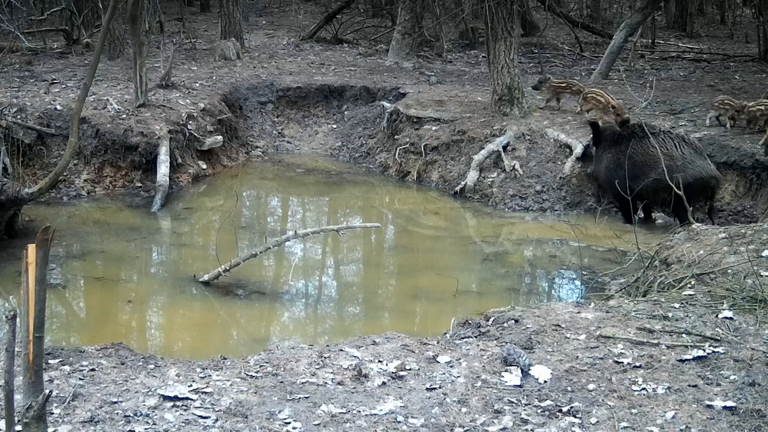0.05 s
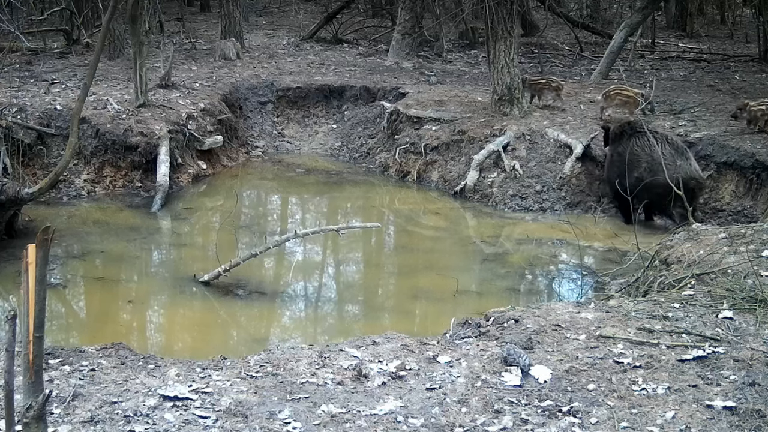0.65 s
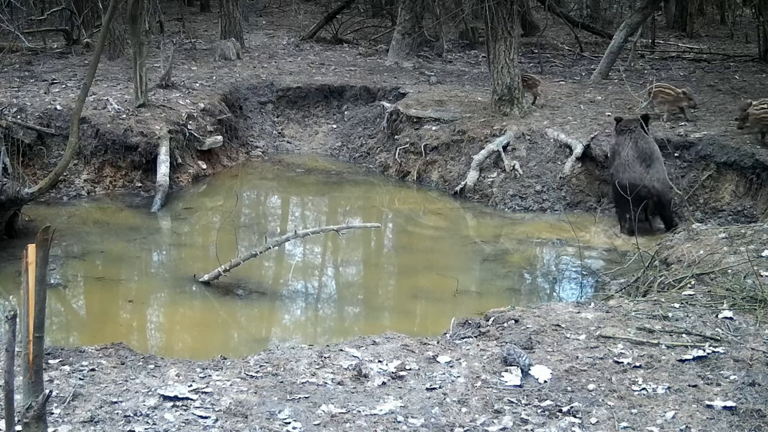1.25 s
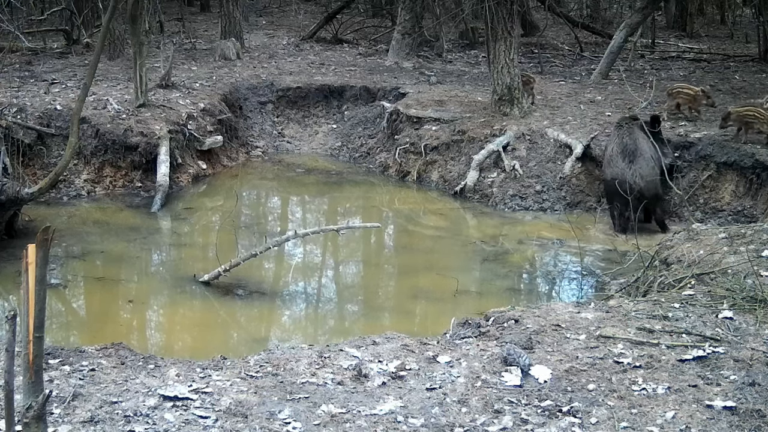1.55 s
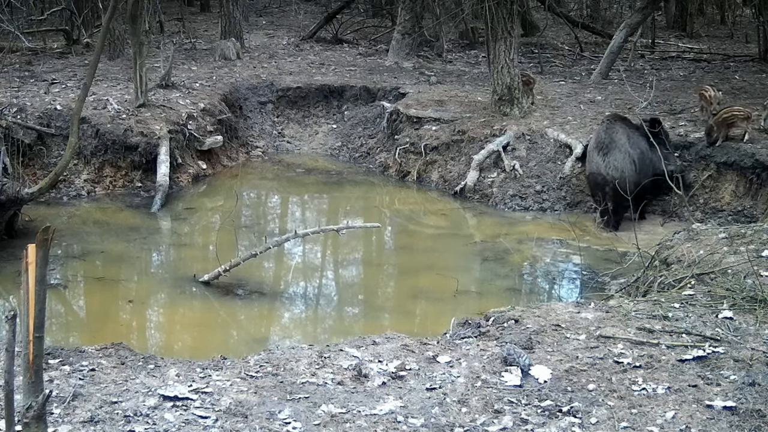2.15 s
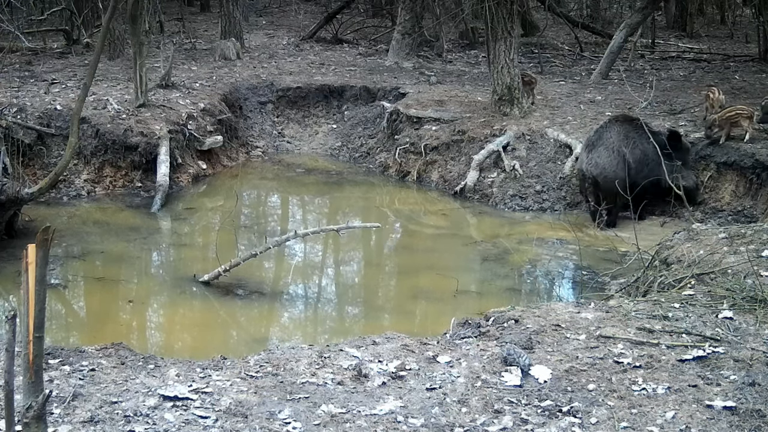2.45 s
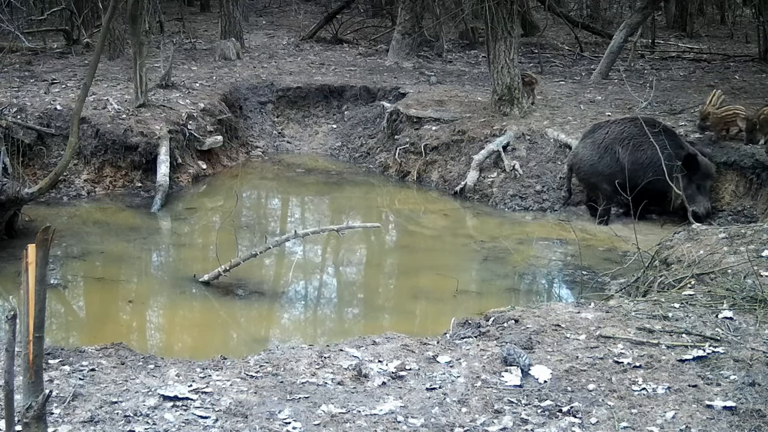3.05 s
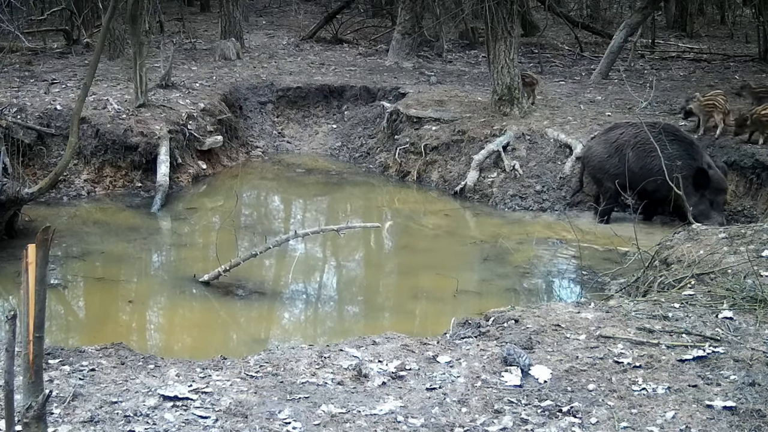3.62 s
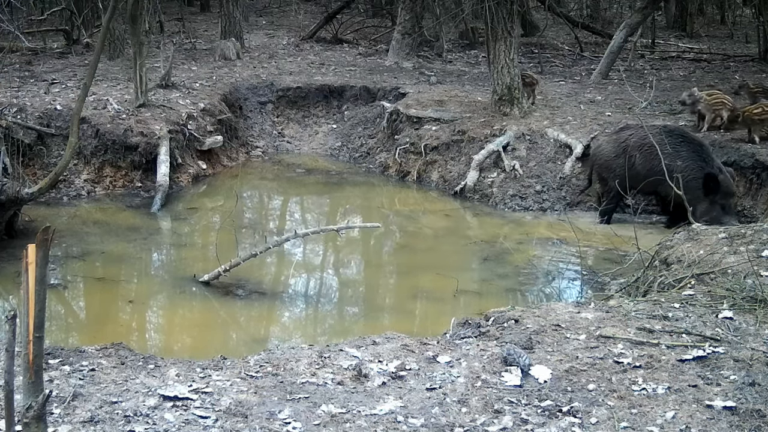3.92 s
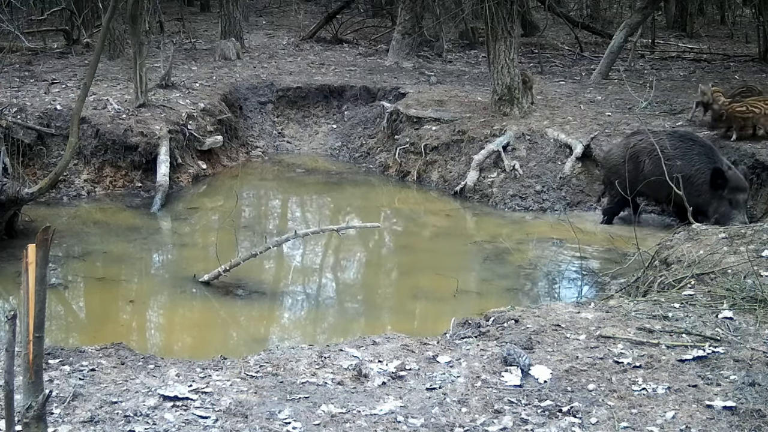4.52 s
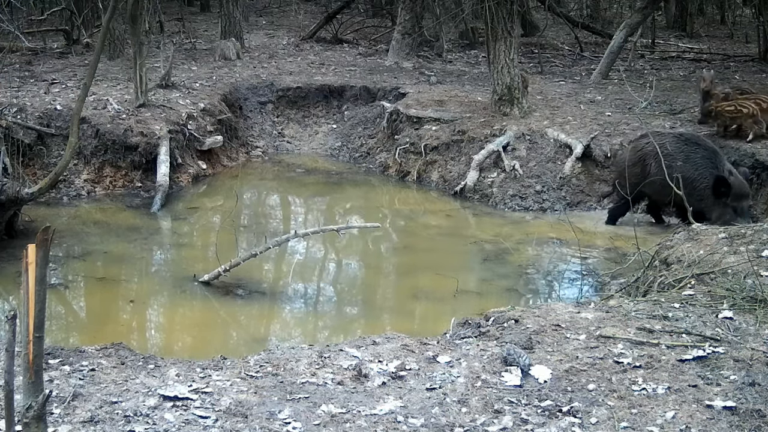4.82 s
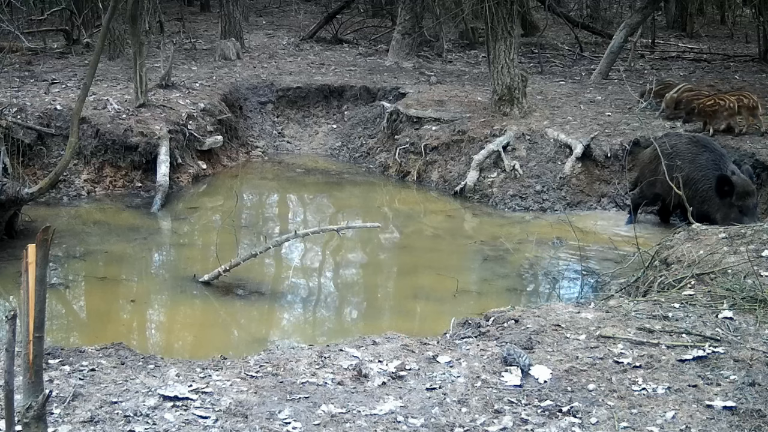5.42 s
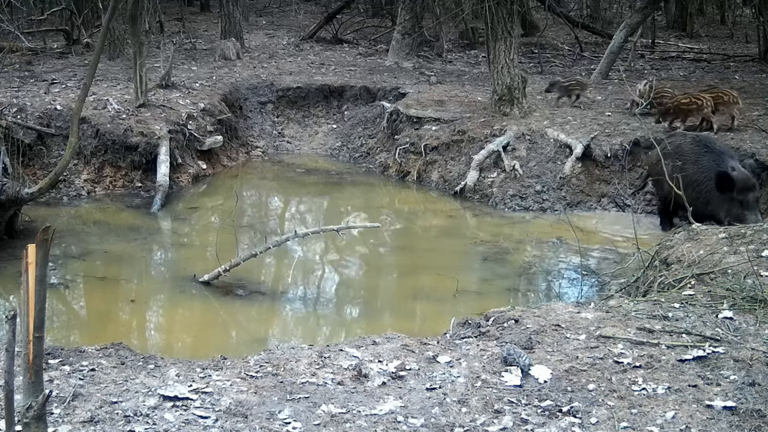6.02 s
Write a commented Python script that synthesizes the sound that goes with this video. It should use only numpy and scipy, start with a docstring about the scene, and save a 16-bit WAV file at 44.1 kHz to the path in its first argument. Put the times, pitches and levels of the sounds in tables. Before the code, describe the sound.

A songbird whistles one quick, high phrase while a second bird calls faintly far off. Some way from the microphone, a wild sow and her piglets shuffle along the bank of a forest pool. Dry leaves crackle, twigs snap and wet mud squelches and plops. The rustling grows louder past the middle, then eases. A soft hush and low rumble lie underneath, and the trees return a short echo.

```python
"""A songbird whistles one phrase over rustling leaves and a low rumble; a second bird calls far off.
The rustle is a wild sow and her piglets on the bank of a forest pool, some way from the listener.
Dry leaves crackle, twigs snap, and wet mud churns and plops under her hooves and snout.
The tree trunks scatter these sounds back as a short, soft echo."""
import sys
import numpy as np
from scipy import signal
from scipy.fft import rfft, irfft
from scipy.io import wavfile
from scipy.ndimage import uniform_filter1d

SR = 44100
rng = np.random.default_rng(int(sys.argv[2]) if len(sys.argv) > 2 else 0)


def put_to_file(sound):
    """Save the sound as 16-bit audio at rate SR, in the file named by the first command-line argument."""
    columns = np.atleast_2d(sound).T  # one column per channel
    safe = np.clip(columns, -1, 1)
    whole_steps = np.round(safe * 32767)
    wavfile.write(sys.argv[1], SR, whole_steps.astype(np.int16))


N = 276507
TIME = np.arange(N) / SR

# The songbird's syllables. Each row: seconds into the syllable, pitch in Hz, relative level in dB.
PIP = [(0, 4470, -4), (0.022, 4740, -4), (.045, 5020, -15)]
FALL = [(0, 4170, -11), (.02, 4165, 2), (.055, 4020, -9.5), (.08, 3975, 5), (.127, 2900, -13)]
ARCH = [(0, 3170, -16), (.029, 3260, 1), (.052, 3850, -0.5), (.07, 4070, -4.5), (.091, 3500, -3),
        (.116, 2750, -4.5)]
RISE = [(0, 3120, -12), (.023, 3310, 0), (.043, 3460, 2), (.067, 3500, -17), (.1, 3640, -14)]
SWEEP = [(0, 2594, -13), (.018, 2994, -5), (.032, 3244, -2), (.045, 4005, 1), (.056, 4800, -0.5),
         (.07, 4920, -11)]
SCOOP = [(0, 3080, 1), (.035, 2854, -6), (.064, 2930, -1), (.092, 3640, -4), (.122, 3850, 1.5),
         (.147, 4100, -19)]
DIP = [(0, 3430, 3), (.031, 3047, -3), (.058, 2900, -1), (.098, 3660, -6), (.128, 3930, 0)]
# Its song. Each row: start in seconds, relative level in dB, syllable.
PHRASE = [(.005, -38.5, PIP), (0.134, -41.5, FALL), (0.332, -40.5, ARCH), (0.528, -39.5, ARCH),
          (.718, -43, ARCH), (.945, -40.5, RISE), (1.084, -42.5, SWEEP), (1.198, -41.5, SWEEP),
          (1.319, -41.5, SWEEP), (1.453, -45.5, SCOOP), (1.657, -44.5, DIP)]
# The far bird's notes. Each row: start and length in seconds, pitch in Hz, relative level in dB.
FAR_NOTES = [(0, .12, 2325, -47), (0.337, .23, 2315, -51), (5.418, .22, 2286, -61)]
# The forest's echo. Each row: frequency in Hz, seconds it takes to fade by 60 dB.
ECHO_FADE = [(200, 0.27), (1500, 0.27), (4000, 0.47), (12000, 0.39)]
# Tone colours: how deep or bright each noise is. Each row: frequency in Hz, relative level in dB.
HUSH_COLOUR = [(20, -16.5), (100, -8.5), (200, -12), (330, -20), (600, -25), (1200, -32), (2500, -42),
               (4500, -34.5), (8000, -36.5), (12500, -36.5)]
RUMBLE_COLOUR = [(12, -21), (22, -4), (34, -2), (45, 0), (56, 3), (68, -5.5), (90, -10.5), (150, -23.5),
                 (400, -52)]
DRY_LEAF_COLOUR = [(800, -32), (2000, -7.5), (3200, -4), (5000, -1), (7500, -2), (10000, -4), (12500, -3)]
DAMP_LEAF_COLOUR = [(150, -37), (400, -7), (900, -3.5), (1600, 1), (2700, 1), (4200, 0), (7000, -8.5),
                    (12500, -68)]
CRUNCH_COLOUR = [(200, 8), (900, -8), (2500, 2), (5000, 4), (8000, 1), (12500, -3.5)]
# The whole group's restless shuffling. Each row: time in seconds, relative level in dB.
SHUFFLE = [(0, -59.5), (.85, -60), (1.2, -58.5), (1.42, -61), (1.68, -57), (2.1, -60), (2.4, -69.5),
           (2.62, -66), (2.85, -58.5), (4.1, -54.5), (4.31, -65.5), (4.6, -55), (5.0, -70), (5.25, -69),
           (5.5, -60.5), (5.8, -64), (6.0, -60.5), (6.27, -62.5)]
# Steps and shoves. Each row: moment of full weight, rise time and fall time, all in seconds,
# then the levels of dry leaves and of damp leaves in dB.
STEPS = [(.005, 0.012, 0.037, -54, -42.5), (.175, 0.024, 0.096, -52, -53), (.35, 0.023, 0.063, -51, -64),
         (.49, 0.034, 0.068, -56, -58), (.56, 0.051, 0.065, -51.5, -65), (.64, .04, 0.031, -47, -57),
         (.76, 0.026, 0.016, -53, -68), (.94, 0.024, 0.06, -69, -48), (1.046, 0.035, .012, -67, -50.5),
         (1.083, .006, 0.028, -54, -48), (1.14, 0.015, 0.018, -45, -67), (1.58, .015, 0.033, -51.5, -59),
         (1.776, 0.079, 0.03, -58.5, -42.5), (1.89, 0.022, 0.074, -53.5, -49), (2.06, .02, 0.056, -55, -62),
         (2.45, 0.012, .012, -56, -66), (2.725, 0.053, 0.14, -63, -48.5), (2.795, 0.034, 0.065, -48, -49.5),
         (2.95, 0.037, 0.092, -41.5, -51.5), (3.14, .03, 0.036, -47.5, -61), (3.326, 0.059, 0.1, -38, -48),
         (3.4, 0.034, 0.02, -37.5, -48.5), (3.56, 0.069, 0.075, -38, -46), (3.74, 0.069, .04, -42, -46.5),
         (3.82, 0.035, .02, -34, -39.5), (3.895, .008, 0.011, -43, -43), (3.98, 0.053, 0.18, -40.5, -50),
         (4.09, 0.092, 0.019, -47, -46.5), (4.2, .025, 0.02, -51, -43), (4.38, 0.03, 0.09, -43, -46.5),
         (4.48, .05, 0.095, -37, -44), (4.61, 0.051, .04, -46, -62), (4.72, 0.068, 0.043, -50.5, -49.5),
         (4.799, 0.031, 0.0083, -52.5, -48.5), (5.08, 0.02, .03, -60, -65), (5.45, 0.096, .04, -53, -81),
         (5.55, 0.027, .04, -52.5, -63), (5.62, 0.011, 0.084, -53, -70), (5.735, 0.028, 0.011, -57, -52),
         (5.85, 0.012, 0.021, -80, -56), (6.07, 0.008, 0.013, -46, -46), (6.2, 0.017, 0.034, -52, -57),
         (6.265, 0.031, .05, -49.5, -50.5)]
# Hooves crushing leaves. Each row: middle in seconds, level in dB, half length in seconds.
CRUNCHES = [(0.17, -50, 0.013), (0.928, -45, 0.0066), (0.951, -44.5, .0061), (1.747, -50.5, .004),
            (1.889, -51, 0.0044), (2.899, -41, 0.0054), (2.947, -46, .0046), (2.984, -38.5, 0.0037),
            (3.261, -42, 0.0023), (3.401, -36, 0.012), (3.773, -34.5, .0058), (3.834, -32, 0.0039),
            (4.094, -38.5, 0.0036), (4.371, -39, .0018), (4.454, -38, .0045), (6.063, -45, .002),
            (6.068, -33.5, 0.0016), (6.201, -42.5, 0.0013)]
# Air pockets popping in mud and water.
# Each row: start in seconds, peak level in dB, starting pitch in Hz, fade time in seconds.
PLOPS = [(.859, -48, 1130, 0.005), (1.046, -39, 326, 0.011), (1.05, -31.5, 1160, 0.0024),
         (1.048, -33.5, 1830, .002), (1.0777, -35, 1460, 0.0031), (1.08, -39.5, 1060, 0.0086),
         (1.764, -35, 1820, .0023), (1.768, -38, 1050, .002), (1.786, -37, 806, .0012),
         (2.117, -49, 957, 0.01), (2.292, -53, 1450, 0.0059), (2.706, -42, 1120, 0.0056),
         (2.718, -33, 1780, 0.0041), (2.775, -39, 2330, 0.01), (2.791, -40, 359, 0.0061),
         (3.3174, -34.5, 1480, .002), (3.397, -36, 1060, 0.003), (3.819, -28, 1400, 0.00088),
         (4.178, -22, 850, 0.00069), (4.194, -33, 740, .0007), (4.2015, -34.5, 726, 0.002),
         (4.804, -38.5, 1630, 0.0024), (5.7224, -36, 1460, 0.0057), (5.846, -34.5, 1300, 0.00089)]
# Mud hollows opening or filling.
# Each row: start and end in seconds, level in dB, first and last pitch in Hz.
GURGLES = [(0.152, 0.26, -55.5, 300, 360), (1.043, 1.117, -59, 332, 332), (2.713, 2.767, -51, 700, 590),
           (2.756, 2.805, -50.5, 420, 350), (3.573, 3.671, -54, 380, 590), (3.757, 3.843, -58.5, 360, 410),
           (4.773, 4.82, -53, 445, 400)]
# Twigs and stalks breaking. Each row: start in seconds, peak level in dB, pitch in Hz.
SNAPS = [(0.2193, -26.5, 4000), (.3168, -31, 4300), (0.93, -26.5, 5900), (1.094, -33, 5000),
         (1.144, -28, 4570), (1.153, -27, 2900), (1.4985, -37, 6170), (1.7865, -26, 2860),
         (2.515, -37.5, 6060), (3.6684, -21.5, 9300), (3.7429, -16.5, 5850), (3.941, -21.5, 8400),
         (3.968, -14, 6470), (3.9894, -18.5, 8250), (3.996, -22, 7800), (4.101, -26, 7700),
         (4.177, -29, 4630), (4.2176, -28, 4850), (4.858, -38, 6960), (5.064, -34.5, 4750),
         (5.528, -34, 7000), (5.7355, -33.5, 9400), (6.0604, -28.5, 6400), (6.065, -31, 9400)]


def from_db(db):
    """Turns decibels into a gain, the number a sound is multiplied by."""
    return 10 ** (np.asarray(db) / 20)


def unit(x):
    """Scales x to an average strength (rms) of 1."""
    return x / np.sqrt(np.mean(x ** 2) + 1e-20)


def at_hz(points, hz):
    """Reads between a table's rows, with frequencies spaced by octaves."""
    f, value = np.transpose(points)
    return np.interp(np.log(hz + 1), np.log(f + 1), value)


def coloured(x, colour):
    """Filters x by a tone colour (rows of Hz, dB) and sets its strength to 1."""
    gains = from_db(at_hz(colour, np.fft.rfftfreq(len(x), 1 / SR)))
    return unit(irfft(rfft(x) * gains, len(x)))


def add(mix, start_s, sound):
    """Adds a sound to the mix at the given time."""
    part = mix[max(round(start_s * SR), 0):][:len(sound)]
    part += sound[:len(part)]


def ring(hz, fade_s, glide):
    """A dying tone of peak 1; every fade_s its pitch rises by glide times hz."""
    t = np.arange(int(7 * fade_s * SR) + 8) / SR
    tone = np.sin(2 * np.pi * hz * t * (1 + glide * t / fade_s / 2))
    wave = tone * np.exp(-t / fade_s) * (1 - np.exp(-2 * hz * t))
    return wave / abs(wave).max()


def grains(per_s, spread_db, low_hz, high_hz, fade_cycles, glide=0, pitches=32):
    """A steady rain of tiny ringing sounds, most of them weak and a few strong."""
    chance, size, kind = rng.random(N), rng.exponential(1, N), rng.integers(0, pitches, N)
    kicks = from_db(spread_db * np.minimum(size, 4.5)) * rng.choice([-1, 1], N)
    starts = np.flatnonzero(chance < per_s / SR)
    out = np.zeros(N)
    for k, hz in enumerate(np.geomspace(low_hz, high_hz, pitches)):
        grain = hz * ring(hz, fade_cycles / hz, glide)
        at = starts[kind[starts] == k, None]
        samples = at + np.arange(len(grain))
        out += np.bincount(samples.ravel(), (kicks[at] * grain).ravel(), N)[:N]  # sums the copies
    return unit(out)


def wobble(depth_db, smooth_s):
    """A gain that drifts up and down at random."""
    hop = 64
    samples = np.arange(2 * N // hop) * hop
    bell = np.exp(-(np.arange(-60, 61) * hop / SR / smooth_s) ** 2)
    drift = unit(np.convolve(rng.standard_normal(len(samples)), bell, "same"))
    return unit(from_db(depth_db * np.interp(np.arange(N), samples, drift)))


def whistle(hz, db, waver, flutter_db):
    """One pure gliding whistle, a little unsteady in pitch and strength."""
    drift, flutter = unit(uniform_filter1d(rng.standard_normal((2, SR // 2)), size=220))[:, :len(hz)]
    pitch = uniform_filter1d(hz, size=350) * (1 + waver * drift)
    loudness = np.sqrt(2) * from_db(db + flutter_db * flutter) * signal.windows.tukey(len(hz), .12)
    return loudness * np.sin(2 * np.pi * np.cumsum(pitch) / SR)


def songbird():
    """The near bird strings whistled syllables into one phrase."""
    out = np.zeros(N)
    for start, level_db, syllable in PHRASE:
        times, hz, db = np.transpose(syllable)
        t = np.arange(0, times[-1], 1 / SR)
        pitch, level = np.interp(t, times, hz), level_db + np.interp(t, times, db)
        add(out, start, whistle(pitch, level, waver=.006, flutter_db=3))
    return out


def branches(song, bounce_db=-18, count=6):
    """Quick echoes from branches and the ground overlap a gliding whistle and make it quiver."""
    out = song.copy()
    for delay_s, sign in zip(rng.uniform(.00189, .027, count), rng.choice([-1, 1], count)):
        add(out, delay_s, sign * from_db(bounce_db) * song)
    return out


def far_bird(droop_hz=153):
    """A bird deep in the wood holds notes that droop as they end."""
    out = np.zeros(N)
    for start, length, hz, db in FAR_NOTES:
        progress = np.linspace(0, 1, int(length * SR))
        add(out, start, whistle(hz - droop_hz * progress ** 3, db, waver=.012, flutter_db=4))
    return out


def forest(sound, echoes_per_s=1500, gap_s=.006):
    """Trunks send back many faint echoes; the high ones last longer than the low ones."""
    echoes = rng.standard_normal(SR) * (rng.random(SR) < echoes_per_s / SR)
    echoes *= np.arange(SR) > gap_s * SR
    hz, t, spectrum = signal.stft(echoes, SR, nperseg=256)
    fade = np.exp(-np.log(1000) * t / at_hz(ECHO_FADE, hz)[:, None])
    tail = signal.istft(spectrum * fade, SR, nperseg=256)[1]
    return signal.fftconvolve(sound, tail / np.linalg.norm(tail))[:N]


def air(hush_db=-58.5, rumble_db=-52.5):
    """The wood's steady hush, over a low rumble that swells and sinks."""
    hush, rumble = rng.standard_normal((2, N))
    rumble = coloured(rumble, RUMBLE_COLOUR) * wobble(depth_db=1.2, smooth_s=.044)
    return from_db(hush_db) * coloured(hush, HUSH_COLOUR) + from_db(rumble_db) * rumble


def stirring(shuffle):
    """Gains for dry leaves, damp leaves and mud: each step swells under the weight, then fades."""
    dry_power, damp_power = np.zeros((2, N))
    for peak, rise, fall, dry_db, damp_db in STEPS:
        falloff = np.where(TIME < peak, ((TIME - peak) / rise) ** 2, (TIME - peak) / fall)
        press = np.exp(-np.minimum(falloff, 20))
        dry_power += (from_db(dry_db) * press) ** 2
        damp_power += (from_db(damp_db) * press) ** 2
    dry = np.hypot(np.sqrt(dry_power), from_db(-1.7) * shuffle)
    damp = np.hypot(np.sqrt(damp_power), shuffle)
    churn = np.hypot(from_db(-13) * np.sqrt(damp_power), from_db(-4) * shuffle)
    return dry, damp, churn


def fallen_leaves(dry_gain, damp_gain):
    """Dry leaves crackle brightly, damp ones dully; a hoof crushes many at once."""
    leaves = grains(per_s=8000, spread_db=1, low_hz=1980, high_hz=12800, fade_cycles=.94)
    stalks = grains(per_s=210, spread_db=3.5, low_hz=2500, high_hz=11000, fade_cycles=2.2)
    dry = coloured(leaves + from_db(-9.5) * stalks, DRY_LEAF_COLOUR)
    damp = grains(per_s=2800, spread_db=1, low_hz=300, high_hz=9330, fade_cycles=1.14)
    crunch = grains(per_s=7500, spread_db=2.5, low_hz=623, high_hz=13200, fade_cycles=.95)
    weight = sum(from_db(db) * np.exp(-.5 * ((TIME - mid) / half) ** 2) for mid, db, half in CRUNCHES)
    rustle = dry * dry_gain + coloured(damp, DAMP_LEAF_COLOUR) * damp_gain
    rustle *= wobble(depth_db=1.5, smooth_s=.0061)  # leaves give way in small bunches
    return rustle + weight * coloured(crunch, CRUNCH_COLOUR)


def ticks(shuffle):
    """Tiny twigs break at random under the shuffling piglets."""
    breaks = grains(per_s=35, spread_db=2.5, low_hz=2800, high_hz=7950, fade_cycles=2.2)
    return from_db(-6) * breaks * shuffle


def mud(churn):
    """Small bubbles squelch in the churned mud; bigger pockets plop with a rising pitch."""
    squelch = grains(per_s=500, spread_db=2.5, low_hz=284.2, high_hz=1300, fade_cycles=3.2, glide=.031)
    out = coloured(squelch, [(150, 16), (330, -1.5), (700, -4), (1400, -14)]) * churn
    for start, db, hz, fade_s in PLOPS:
        add(out, start, from_db(db) * ring(hz, fade_s, glide=.024))
    return out


def thuds(churn):
    """The soft bank thuds dully under the sow's weight as she churns it."""
    knocks = grains(per_s=120, spread_db=1, low_hz=54.7, high_hz=219, fade_cycles=1.07)
    dull = coloured(knocks, [(30, -5), (65, 1.5), (110, -8), (170, -9), (300, -22), (800, -50)])
    return from_db(-3) * dull * churn


def drips(dry_gain, damp_gain):
    """Flung drops fall back and ring as bubbles, louder when the ground is stirred harder."""
    bubbles = grains(per_s=150, spread_db=3, low_hz=819, high_hz=2987, fade_cycles=12, glide=.029)
    droplets = grains(per_s=170, spread_db=1, low_hz=3000, high_hz=10140, fade_cycles=35, glide=.024)
    bubbles = coloured(bubbles, [(400, 8), (900, -4.5), (1600, -.5), (3000, -.5)])
    return from_db(-6.5) * bubbles * damp_gain + from_db(-11.5) * droplets * dry_gain


def gurgles(width_hz=150):
    """Sucking mud makes the air in a hollow ring; the pitch slides as the hollow changes size."""
    out = np.zeros(N)
    pole = np.exp(-np.pi * width_hz / SR)
    suctions = rng.standard_normal((len(GURGLES), SR // 2))
    for (start, end, db, first_hz, last_hz), suction in zip(GURGLES, suctions):
        hz = np.geomspace(first_hz, last_hz, int((end - start) * SR))
        turn = np.exp(2j * np.pi * np.cumsum(hz) / SR)
        # Shift the noise down, smooth it, shift it back: a band around the pitch is left.
        smooth = signal.lfilter([1], np.poly([pole, pole]), suction[:len(hz)] / turn)
        hollow = unit((turn * smooth).real)
        add(out, start, from_db(db) * hollow * signal.windows.tukey(len(hz), .5))
    return out


def twigs(crack_s=.00036, splinter_db=-17, splinter_s=.0063):
    """A sharp break makes a twig ring for an instant; splintering fibres follow."""
    out, t = np.zeros(N), np.arange(1024) / SR
    force = np.exp(-t / crack_s) + from_db(splinter_db) * np.exp(-t / splinter_s)
    for (start, db, hz), fibres in zip(SNAPS, rng.standard_normal((len(SNAPS), len(t)))):
        snap = signal.lfilter(*signal.iirpeak(hz, Q=3.7, fs=SR), fibres * force)
        add(out, start, from_db(db) * snap / abs(snap).max())
    return out


def scene():
    """Mixes birds, pigs and air into one channel; the far bird is heard only as an echo."""
    shuffle = from_db(np.interp(TIME, *np.transpose(SHUFFLE)))
    dry_gain, damp_gain, churn = stirring(shuffle)
    pigs = fallen_leaves(dry_gain, damp_gain) + twigs() + ticks(shuffle)
    pigs += mud(churn) + gurgles() + drips(dry_gain, damp_gain)
    near, far = branches(songbird()), far_bird()
    echoes = forest(from_db(-10.5) * pigs + from_db(-11.5) * near + from_db(-8) * far)
    return (pigs + thuds(churn) + from_db(-5) * near + echoes + air())[None]


def record(dry, cutoff_hz=12620):
    """Cuts away the highest treble."""
    low_pass = signal.firwin(401, cutoff_hz, window=("kaiser", 8), fs=SR)
    return signal.oaconvolve(dry, low_pass[None], "same")


dry = scene()
out = record(dry)
put_to_file(out)
```